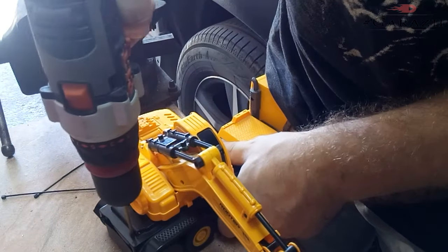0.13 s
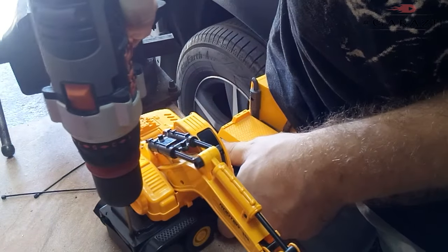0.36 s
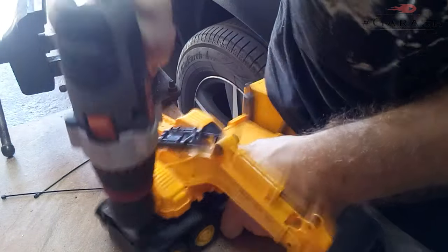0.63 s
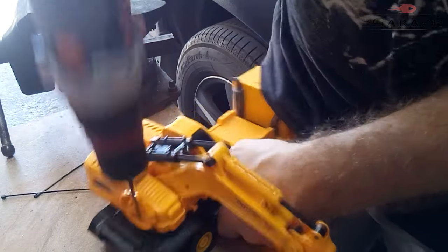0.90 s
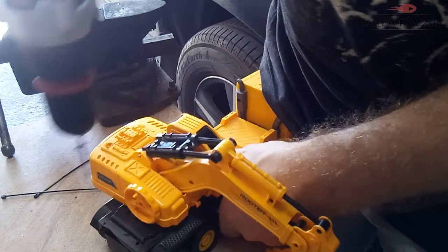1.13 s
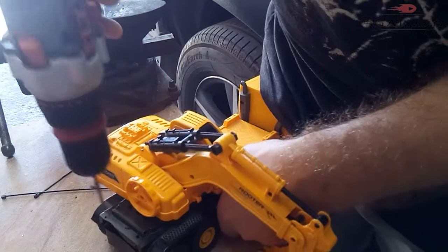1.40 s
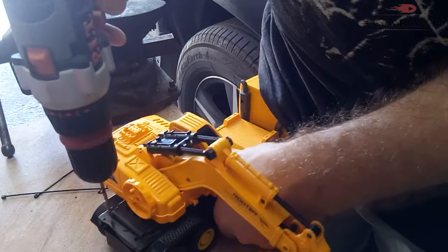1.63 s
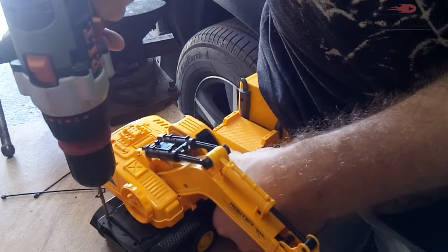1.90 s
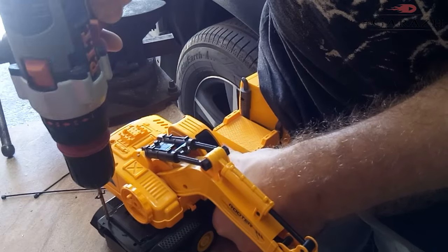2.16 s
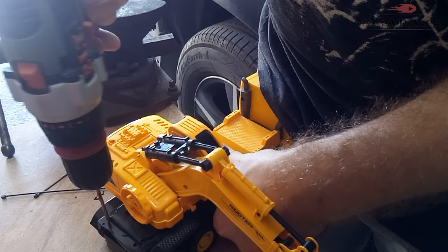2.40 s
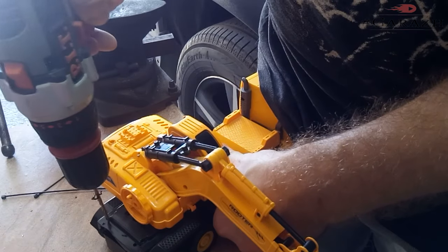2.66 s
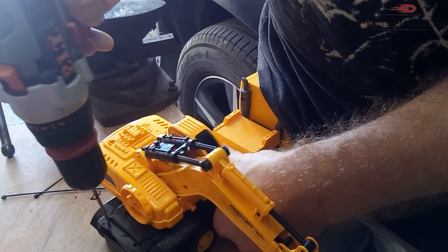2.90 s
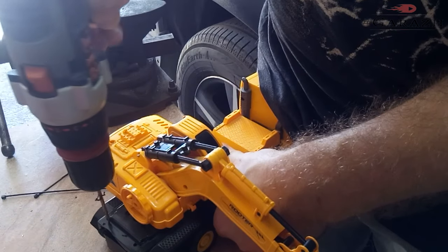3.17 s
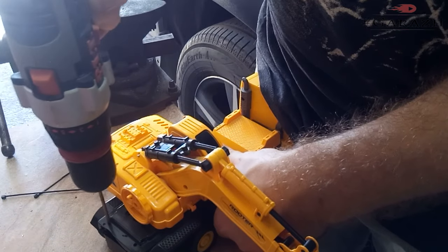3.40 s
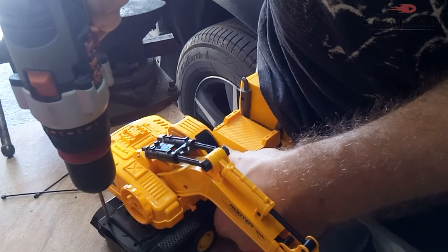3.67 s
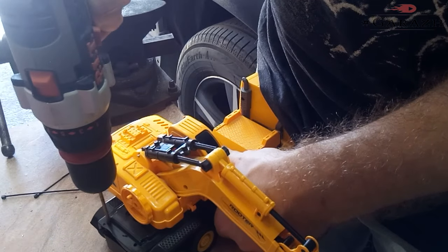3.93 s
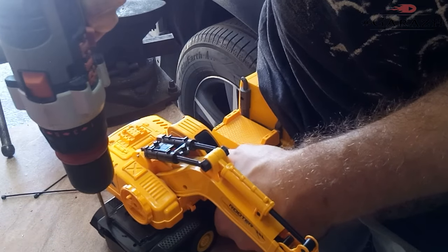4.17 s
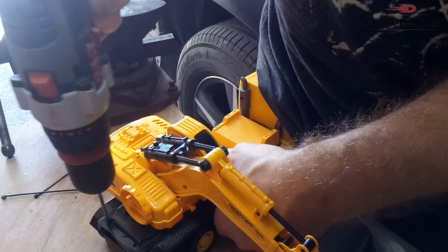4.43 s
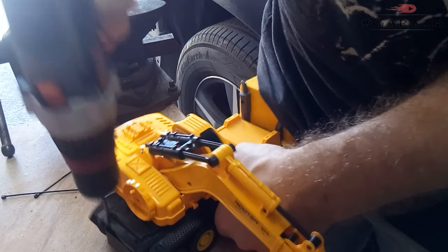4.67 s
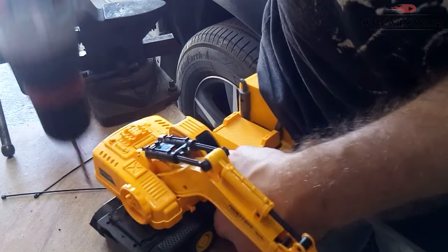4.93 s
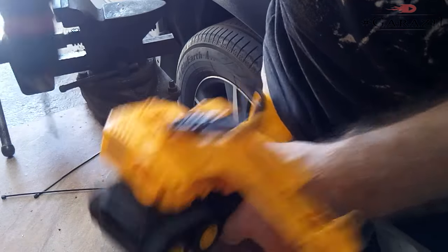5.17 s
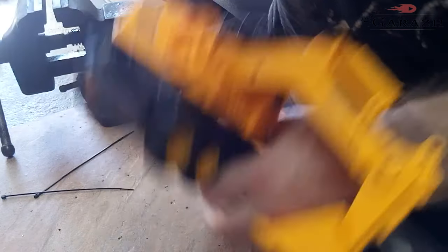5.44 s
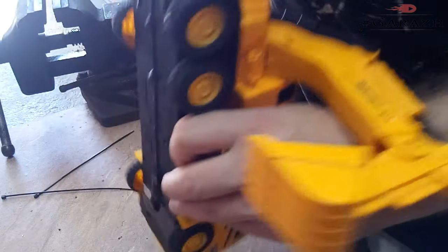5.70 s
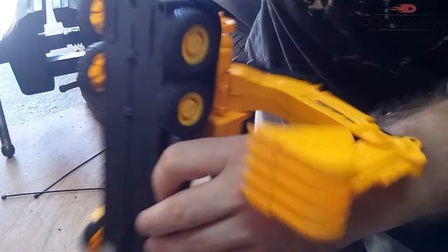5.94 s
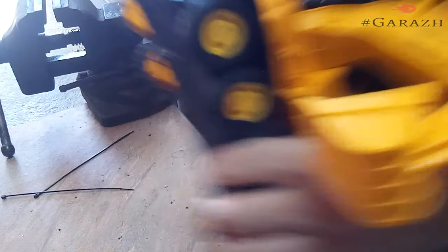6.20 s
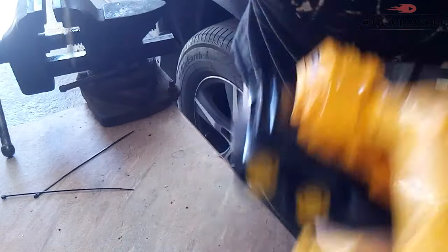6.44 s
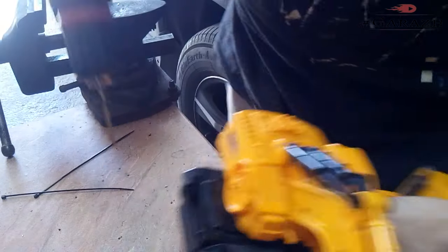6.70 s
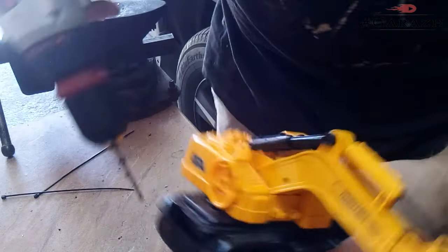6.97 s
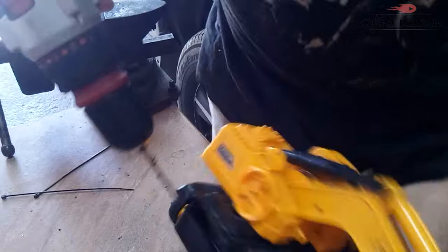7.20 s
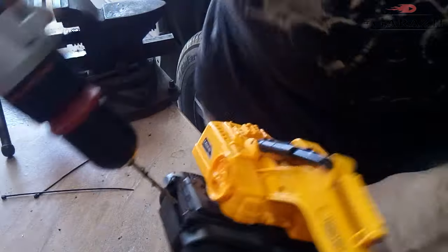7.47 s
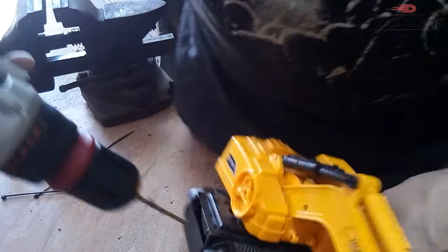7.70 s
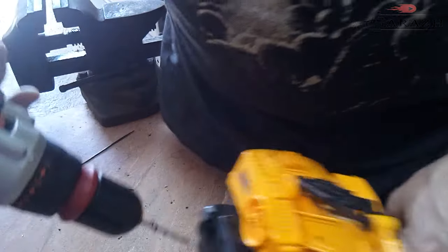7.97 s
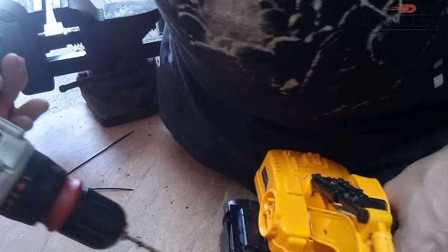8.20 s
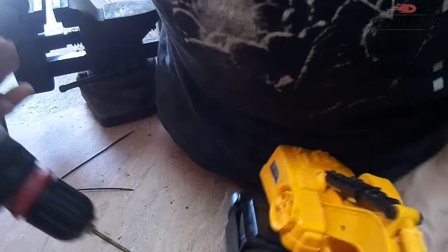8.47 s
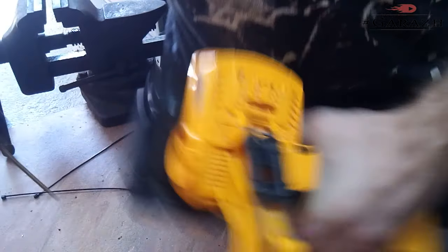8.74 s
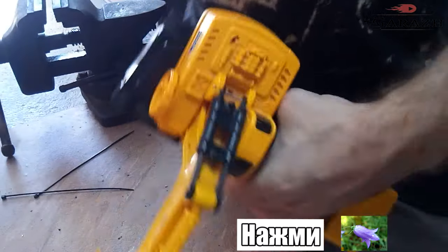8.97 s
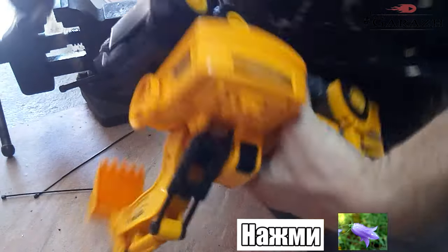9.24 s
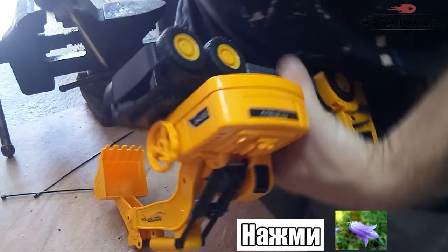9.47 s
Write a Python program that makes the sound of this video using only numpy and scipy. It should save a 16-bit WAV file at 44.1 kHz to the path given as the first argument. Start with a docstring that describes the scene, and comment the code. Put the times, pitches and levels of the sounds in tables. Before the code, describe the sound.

Close to the microphone in a small garage, a cordless drill already runs, grabs with a harsh plastic scrape and rattle, then stops. After a quiet gap it spins up again, bores steadily for over a second and brakes with a sharp clatter. Then the hollow toy is handled: light knocks, rubbing and dull thuds over faint hiss and low rumble.

```python
"""Cordless drill and hollow toy

A cordless drill bores two holes in a hollow plastic toy on a garage floor, close to the microphone.
The motor sings its shaft orders over gear clatter that rings the housing; scraping noise rings the toy
as the bit breaks through; then the toy is turned in the hands, knocking and scraping by modal synthesis.
Rumble, hiss and a short room tail surround them; the preamplifier rounds peaks and the converter clips."""
import sys
import numpy as np
from scipy import signal
from scipy.fft import rfft, irfft
from scipy.io import wavfile
from scipy.ndimage import uniform_filter1d

SR = 44100
rng = np.random.default_rng(int(sys.argv[2]) if len(sys.argv) > 2 else 0)


def nominal_scale(level):
    """Amplitude ratio for a level in decibels (scalar or array-like)."""
    x = np.asarray(level, float) / 20
    return 10 ** x


def master_out(mix):
    """Clip the mix to full scale and print it as 16-bit PCM to the path in sys.argv[1]."""
    frames = np.transpose(np.atleast_2d(mix))
    ceiling = np.clip(frames, -1, 1)
    pcm = np.round(ceiling * 32767).astype(np.int16)
    wavfile.write(sys.argv[1], SR, pcm)


N = 423801
T = np.arange(N) / SR
APART = 997  # samples between unrelated impacts

# Vibration modes of the hollow toy. Each row: frequency in Hz, free 60 dB decay time in seconds,
# relative level in dB.
TOY = [(428, .06, -6.5), (488, .06, -1.5), (555.4, 0.054, 2.5), (633, .07, -1), (707, .07, -2.5),
       (797, 0.044, -3.5), (882, .08, -1.5), (912, .06, -5), (994, .06, -2), (1100, .05, -12),
       (1350, 0.071, -11), (1520, 0.039, -2.5), (1658, 0.055, 0.5), (1838, .04, -6), (2100, .025, -7.5),
       (2356, .03, -5), (2704, .02, -4), (2896, 0.0084, -6), (3350, .02, -4), (3704, .025, -5),
       (4180, .015, -8), (4610, .015, -13.5), (5200, .01, -17)]
# Frequencies in Hz at which the colour of a blow or a stroke is set, from boom to snap.
BAND_HZ = (600, 880, 1600, 3000)


def level(x, db):
    """Root-mean-square normalization: scale to an rms level in dB."""
    return x * nominal_scale(db) / np.sqrt(np.mean(x ** 2))


def coloured(x, spectrum):
    """Spectral shaping: weight the Fourier spectrum by (Hz, dB) points on a log axis; rms 1."""
    hz, db = np.transpose(spectrum)
    f = np.fft.rfftfreq(N, 1 / SR) + 1
    weight = nominal_scale(np.interp(np.log(f), np.log(hz), db, left=-80, right=-80))
    return level(irfft(rfft(x) * weight, N), 0)


def ring(x, hz, t60):
    """Damped resonance: a two-pole mode; white noise of rms 1 comes out near rms 1."""
    r = np.exp(-np.log(1000) / (t60 * SR))
    w = 2 * np.pi * hz / SR
    return signal.lfilter([np.sin(w) * np.sqrt(2 - 2 * r * r)], [1, -2 * r * np.cos(w), r * r], x)


def band(x, hz, width_hz):
    """Band-pass resonance: a band with steep sides around its centre; rms 1."""
    edges_hz = [hz - width_hz / 2, hz + width_hz / 2]
    return level(signal.sosfilt(signal.butter(2, edges_hz, "band", fs=SR, output="sos"), x), 0)


def steep(x, hz, kind):
    """Sixth-order Butterworth filtering on one side of a cutoff: "low" or "high" passes."""
    return signal.sosfilt(signal.butter(6, hz, kind, fs=SR, output="sos"), x)


def walk(rate):
    """Random modulation: levels held 1 / rate s and smoothed twice; spread near 1."""
    k = int(SR / rate)
    held = np.repeat(rng.standard_normal(N // k + 1), k)
    return 1.5 * uniform_filter1d(uniform_filter1d(held, k), k)[:N]


def grit(spread_db):
    """Granular contact: noise whose samples have heavy-tailed sizes, as many tiny impacts; rms 1."""
    return level(rng.standard_normal(N) * nominal_scale(spread_db * rng.exponential(size=N)), 0)


def gate(start, end, attack, release):
    """First-order response: exponential attack, hold, exponential release; all in seconds."""
    rise = 1 - np.exp(-np.maximum(T - start, 0) / attack)
    return rise * np.exp(-np.maximum(T - end, 0) / release)


def hiss():
    """Stationary broadband noise: white noise given a fixed spectrum."""
    # Each row: frequency in Hz, relative spectral density in dB per Hz.
    hiss_colour = [(120, -18), (200, 1.5), (231, -3.5), (294, -0.5), (328, -1.5), (537, -1), (706, -3.5),
                   (1100, -8.5), (6110, -14), (8640, -27), (13400, -26), (15000, -16.5), (15800, -15.5)]
    return nominal_scale(-56) * coloured(rng.standard_normal(N), hiss_colour)


def rumble():
    """Low-frequency noise: a murmur of the building that swells, mostly while drill or toy is handled."""
    # Each row: frequency in Hz, relative spectral density in dB per Hz.
    rumble_colour = [(25, -11.5), (60, -2), (110, 4), (155, 4), (220, -4), (300, -6), (450, -30.5)]
    # Swells of low rumble, most of them while the drill or toy is handled.
    # Each row: start in seconds, end in seconds, level in dB before the wavering.
    swells = [(-.1, .44, -53), (.42, .85, -40), (2.4, 3.1, -64), (3.4, 4.5, -60), (4.5, 4.88, -43),
              (5.28, 5.7, -54), (6.97, 7.33, -47), (7.52, 8.4, -50), (8.45, 9.08, -48), (9.33, 9.7, -46)]
    edge_s, murmur_db = .04, -56
    gain = nominal_scale(murmur_db) + sum(nominal_scale(db) * gate(start, end, edge_s, edge_s) for start, end, db in swells)
    wavering = nominal_scale(1.5 * walk(13))
    return gain * wavering * coloured(rng.standard_normal(N), rumble_colour)


def garage_tail(near):
    """Diffuse reverberation: convolution with exponentially decaying noise of unit energy."""
    t60_s, gap_s, tail_db = 0.23, .004, -13
    t = np.arange(SR // 2) / SR
    tail = rng.standard_normal(len(t)) * nominal_scale(-60 * t / t60_s) * (t > gap_s)
    return nominal_scale(tail_db) * signal.fftconvolve(near, tail / np.sqrt(np.sum(tail ** 2)))[:N]


def scrape():
    """Stick-slip friction: dense small slips ring the toy's modes, damped by the hands."""
    # Hands, bit and floor rubbing the toy; the loudest are the bit grabbing as it breaks through.
    # Each row: start in seconds, end in seconds, relative level in dB, change up to the end in dB,
    # treble against the body in dB.
    strokes = [(.44, .7, -29, 0, 0), (.483, .52, -26, 9, 11), (.519, .571, -11.5, 1, 14),
               (.69, .97, -30, -26, 3), (1.42, 1.6, -56, 0, -8), (1.8, 1.9, -56, 0, -4),
               (4.78, 5.08, -46, -13, -6), (5.3, 5.6, -54, -2, -6), (5.99, 6.22, -52, -3, -7),
               (6.29, 6.45, -53, -3, -6), (6.97, 7.11, -50, 5, -14), (7.11, 7.35, -43, -11, -8),
               (7.28, 7.46, -60, 0, 6), (7.42, 7.66, -50, 6, -10), (7.71, 8.08, -41, -9, -10),
               (8.16, 8.45, -58, 5, -10), (8.5, 8.71, -58, 22, -9), (8.74, 8.9, -35, 0, -10),
               (8.9, 9.08, -46, 0, 2), (9.16, 9.3, -41, -16, -8), (9.36, 9.61, -46, 1, -9)]
    # A rubbing hand damps the knock range most: change in dB at each of BAND_HZ.
    hand_db = (0, 0, -4, 0)
    grip_s, let_go_s = .005, .008  # attack and release of a stroke
    rub = grit(3.1) * nominal_scale(3.0 * walk(45))
    body, treble = np.full((2, N), 1e-9)
    for start, end, db, change_db, treble_db in strokes:
        progress = np.clip((T - start) / (end - start), 0, 1)
        stroke = gate(start, end, grip_s, let_go_s) * nominal_scale(db + change_db * progress)
        body = body + stroke
        treble = treble + nominal_scale(treble_db) * stroke
    out = 0
    for m, (hz, t60, mode_db) in enumerate(TOY):
        treble_share = np.interp(np.log(hz), np.log(BAND_HZ), [0.1, 0, .3, 1])
        slips = body * (treble / body) ** treble_share * np.roll(rub, APART * m)
        damping_db = np.interp(np.log(hz), np.log(BAND_HZ), hand_db)
        out = out + nominal_scale(mode_db - 11.5 + damping_db) * ring(slips, hz, .6 * t60)
    return out


def knocks(modes, blows):
    """Modal excitation: short rattles of impacts, each on another spot and in a grip that retunes the modes."""
    onset_s = .02  # over which the rms of each mode is set
    t = T[:SR // 4]
    out = np.zeros(N + len(t))
    spots, grips = rng.standard_normal((len(blows), 2, len(modes))).transpose(1, 0, 2)
    impacts = grit(2.32) * nominal_scale(4.0 * walk(220))  # loose parts chatter
    fade = np.exp(-t / 0.0063) + 0.15 * np.exp(-t / .03)  # blow, then loose parts settle
    for (s, db, boom_db, knock_db, snap_db), spot, grip in zip(blows, spots, grips):
        i = int(s * SR)
        contact_s = .003 * nominal_scale(-.25 * snap_db)  # dull blows are softer contacts
        push = (1 - np.exp(-t / contact_s)) * fade
        for m, (hz, t60, mode_db) in enumerate(modes):
            colour_db = np.interp(np.log(hz), np.log(BAND_HZ), [boom_db, 0, knock_db, snap_db])
            j = (i + APART * (m // 2)) % (N - len(t))  # each pair of modes is reached by other impacts
            rung = ring(push * impacts[j:j + len(t)], hz * (1 + .02 * grip[m]), t60)
            gain = nominal_scale(db + colour_db + mode_db + 2.0 * spot[m])
            out[i:i + len(t)] += gain * rung / rung[:int(onset_s * SR)].std()
    return out[:N]


def toy():
    """Radiation cutoff: the small shell radiates no bass of its own; the board under it thuds."""
    # Blows on the toy. Each row: start in seconds, level in dB to which the mode levels are added, then
    # against it in dB: boom, knock and snap, at the first, third and fourth of BAND_HZ.
    toy_blows = [(0.603, -30, 2, -2, -9), (0.701, -33, -4, -5, -4), (0.722, -34, 1, -7, -10),
                 (0.741, -24, -7, -8, -12), (0.778, -25, -4, -6, -11), (0.816, -32, 1, -10, -2),
                 (0.838, -45, 2, -1, -2), (1.454, -59, -2, -12, -11), (1.822, -59, -7, -3, 0),
                 (1.845, -55, -4, -14, -13), (4.557, -36, -5, 0, 6), (4.721, -27, 3, -4, -1),
                 (4.731, -20, -4, -5, -5), (4.75, -34, -4, -9, -3), (4.826, -28, -8, -28, -22),
                 (4.857, -36, -17, -19, -13), (4.979, -52, -2, -9, -19), (5.024, -48, -11, -11, -26),
                 (5.164, -34, -10, -9, -11), (5.186, -44, 4, -4, -11), (5.27, -28, -6, -12, -9),
                 (5.296, -46, -9, -1, -3), (5.518, -50, -18, -6, -19), (6.108, -53, -12, 4, -12),
                 (6.821, -47, -27, -14, -8), (6.934, -47, -21, -22, -21), (6.956, -30, -7, -11, -13),
                 (7.108, -41, -14, -25, -26), (7.125, -40, -12, -2, -7), (7.147, -48, 2, 3, -4),
                 (7.184, -37, -11, -11, -20), (7.214, -35, -11, -8, -13), (7.497, -40, -10, -13, -24),
                 (7.548, -49, 6, 2, 1), (7.7, -32, -17, -16, -27), (7.751, -47, -4, -7, -11),
                 (7.779, -41, -6, -10, -13), (7.857, -43, -3, -12, -15), (8.122, -37, -1, -7, -15),
                 (8.136, -33, -2, -5, -13), (8.169, -49, 3, -12, -3), (8.407, -52, 0, -23, -22),
                 (8.444, -26, -12, -20, -16), (8.539, -43, -3, -19, -15), (8.553, -57, 7, 6, 13),
                 (8.578, -60, 14, 9, 5), (8.644, -41, -12, -9, -14), (8.713, -26, -5, 6, 8),
                 (8.741, -39, 4, 3, -2), (8.811, -46, -7, 4, 4), (8.843, -42, -5, -2, -9),
                 (8.956, -54, 8, 0, 0), (9.175, -45, -5, -2, -19), (9.313, -36, 2, 6, 11),
                 (9.331, -31, 0, 1, 10), (9.354, -44, 1, 1, -4), (9.537, -37, -1, -14, -11)]
    # The toy bumps the board. Each row: start in seconds, level in dB to which the mode levels are added.
    thuds = [(4.732, -27), (5.295, -33), (6.974, -30), (8.137, -37), (8.717, -22), (8.819, -28),
             (9.334, -31)]
    # Modes of the board. Each row: frequency in Hz, 60 dB decay time in seconds, relative level in dB.
    board_modes = [(120, 0.08, -18), (160, .18, -7), (235, 0.08, -5)]
    toy_bottom_hz, mic_top_hz, board_bottom_hz = 330, 5800, 85
    shell = steep(knocks(TOY, toy_blows) + scrape(), toy_bottom_hz, "high")
    dull = steep(shell, mic_top_hz, "low")  # microphone port
    bright = steep(shell, mic_top_hz, "high")  # a little of the treble still gets past the port
    board = knocks(board_modes, [(s, db, 0, 0, 0) for s, db in thuds])
    return dull + nominal_scale(-11) * bright + steep(board, board_bottom_hz, "high")


def trigger():
    """Current chopping: a thin, fluttering whine and its second harmonic as the trigger closes."""
    # Steps of the speed switch. Each row: start in seconds, end in seconds, frequency in Hz, then
    # levels in dB before the flutter: fundamental, second harmonic.
    whine_steps = [(3.152, 3.17, 2280, -57, -54), (3.173, 3.193, 2700, -42, -50),
                   (3.193, 3.213, 2800, -40, -62)]
    edge_s = .004
    clock = 2 * np.pi * np.cumsum(1 + .012 * walk(400)) / SR  # unsteady time, so the pitch wavers
    whine = np.zeros(N)
    for start, end, hz, first_db, second_db in whine_steps:
        pair = nominal_scale(first_db) * np.sin(hz * clock) + nominal_scale(second_db) * np.sin(2 * hz * clock)
        whine += gate(start, end, edge_s, edge_s) * pair
    return np.sqrt(2) * whine * nominal_scale(3.0 * walk(250))


def motor():
    """Motor dynamics: exponential spin-up, sag under load and linear braking of the shaft.

    Returns shaft speed and free speed in Hz, and the gain of the drill."""
    # Squeezes of the trigger. Each row: on in seconds, bit breaks through in seconds, off in seconds,
    # free shaft speed in Hz, drill level in dB to which the levels of its parts are added.
    bursts = [(-1.0, .44, .75, 276.8, -25.5), (3.16, 4.44, 4.735, 280, -26.5)]
    spin_up_s = .07  # time constant of the speed
    gears_bite_s, swell_s = .036, .03  # the sound starts late and swells
    sag_hz, sag_s = 5, .05  # the shaft slows while the bit chews out of the hole
    brake_hz_per_s, brake_db_per_s = 260, 290
    hz, free, gain = np.zeros((3, N))
    for on, through, off, free_hz, db in bursts:
        coast = np.maximum(T - off, 0)
        speed = free_hz * (1 - np.exp(-np.maximum(T - on, 0) / spin_up_s))
        speed = speed - sag_hz * gate(through, T[-1], sag_s, 1) - brake_hz_per_s * coast
        hz = np.where(T >= on, np.maximum(speed, 0), hz)
        free = np.where(T >= on, free_hz, free)
        gain = gain + gate(on + gears_bite_s, T[-1], swell_s, 1) * nominal_scale(db - brake_db_per_s * coast)
    return hz, free, gain


def drill():
    """Order synthesis: wavering shaft orders over tooth clatter that throbs once a turn and rings the housing."""
    # Multiples of the shaft speed: whole for the motor, in thirds for the planet gears.
    orders = (1, 2, 3, 6, 7, 8, 26 / 3, 28 / 3, 10, 31 / 3, 12, 13, 40 / 3, 14, 15, 16, 17, 19, 20, 21, 22,
              24, 33, 36, 54)
    # Level of each order in dB against the drill level, before the trim of the tones.
    order_levels = (-30.5, -20.5, -15.5, -14.5, -29, -25.5, -22.5, -23.5, -24.5, -22, -14.5, -22.5, -25,
                    -24, -24.5, -26.5, -27, -30.5, -31, -24.5, -35.5, -42, -45.5, -57.5, -47)
    # How an order answers the inrush current. Keys: order; values: share of inrush_db, without unit.
    commutator = {1: -.5, 2: -.5, 3: -.4, 12: .1, 21: .8}
    # Gear clatter. Each row: frequency in Hz, relative spectral density in dB per Hz.
    gear_colour = [(200, -26.5), (450, -18), (600, -9), (1200, -8), (2000, -6.5), (3500, -8), (5700, -12.5),
                   (6500, -22.5), (7800, -37), (13500, -52), (15200, -32.5), (15600, -35)]
    # Drill housing. Each row: centre frequency in Hz, width in Hz, level in dB against the drill level.
    housing_modes = [(560, 90, -24.5), (950, 160, -21), (1620, 260, -6.5), (2750, 860, -19),
                     (3850, 720, -17), (5000, 350, -21), (6090, 300, -30.5)]
    inrush_db = 24  # extra commutator ripple at standstill current
    # a resonance that the commutator tone, the third order, sweeps through
    singer, sing_hz, sing_width_hz, sing_db = 3, 590, 90, 24
    hz, free, gain = motor()
    turn = 2 * np.pi * np.cumsum(hz * (1 + .0017 * walk(25))) / SR
    on = gain > 1e-5
    slip = np.sqrt(np.abs(1 - hz[on] / free[on]))
    tones = np.zeros(N)
    for k, order_db in zip(orders, order_levels):
        boost = inrush_db * slip * commutator.get(k, 0)
        if k == singer:
            boost = boost + sing_db * np.exp(-((k * hz[on] - sing_hz) / sing_width_hz) ** 2)
        settle = -.002 * k * np.abs(free[on] - hz[on])  # high orders firm up only at full speed
        size = nominal_scale(order_db + boost + settle + 2.2 * walk(18)[on]) * np.sqrt(2)
        tones[on] += size * np.sin(k * turn[on] + 2 * np.pi * rng.random())
    teeth = grit(2.3) * (1 + 0.3 * np.cos(turn)) * nominal_scale(0.48 * walk(40))
    housing = np.zeros(N)
    for mode_hz, width_hz, mode_db in housing_modes:
        housing += nominal_scale(mode_db + 1.8 * walk(50)) * band(teeth, mode_hz, width_hz)
    return gain * (nominal_scale(-0.6) * tones + nominal_scale(-4.5) * coloured(teeth, gear_colour) + housing)


def scene():
    """Superposition: drill and toy with a short garage tail, over rumble and hiss."""
    near = drill() + trigger() + toy()
    return (near + garage_tail(near) + rumble() + hiss())[None]


def roll_off(x):
    """The treble ends steeply here."""
    return signal.sosfilt(signal.butter(12, 16080, fs=SR, output="sos"), x)


def record(dry):
    """Nonlinear distortion: the preamplifier rounds loud peaks and the converter clips at full scale."""
    cubic_share, largest_input = .08, 1.5
    rounded = dry - cubic_share * np.clip(dry, -largest_input, largest_input) ** 3
    return roll_off(np.clip(rounded, -1, 1))


dry = scene()
out = record(dry)
master_out(out)
```